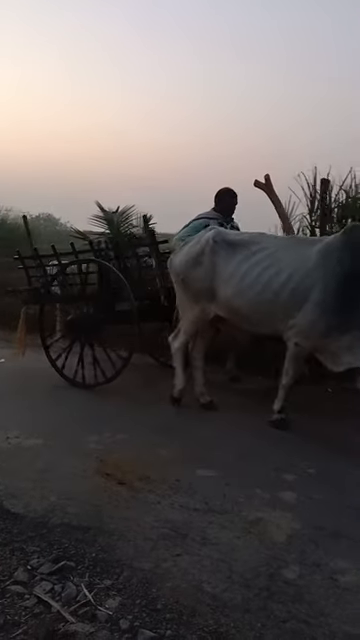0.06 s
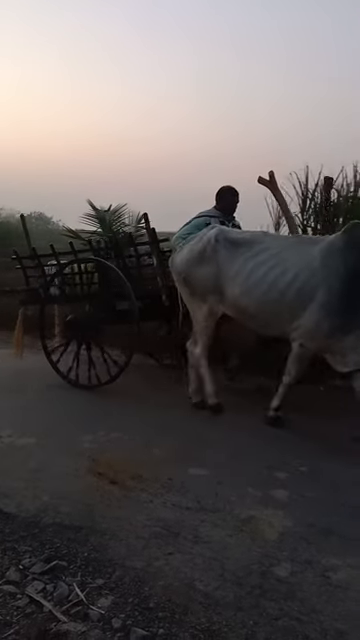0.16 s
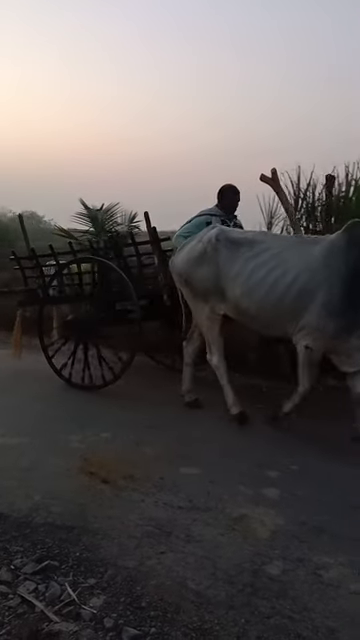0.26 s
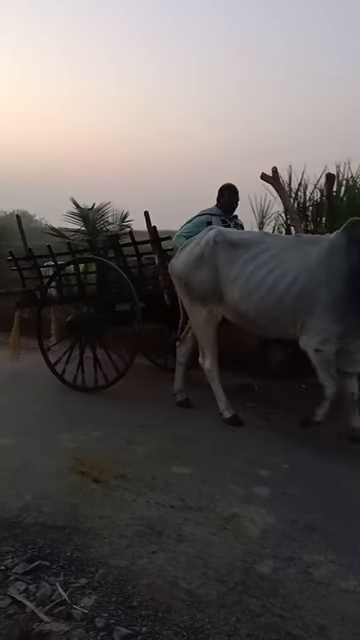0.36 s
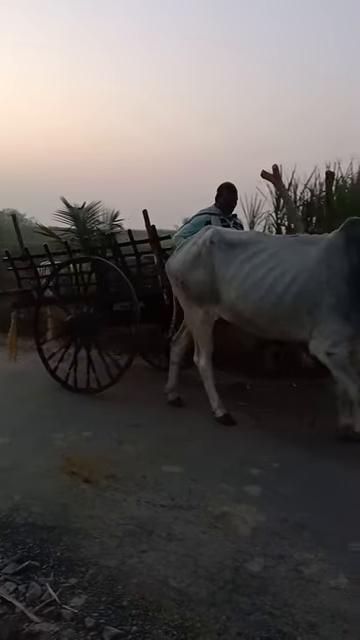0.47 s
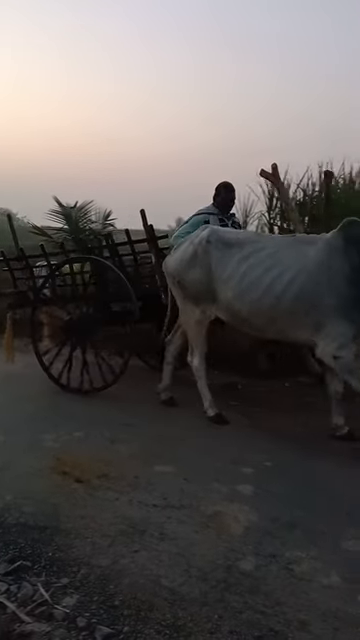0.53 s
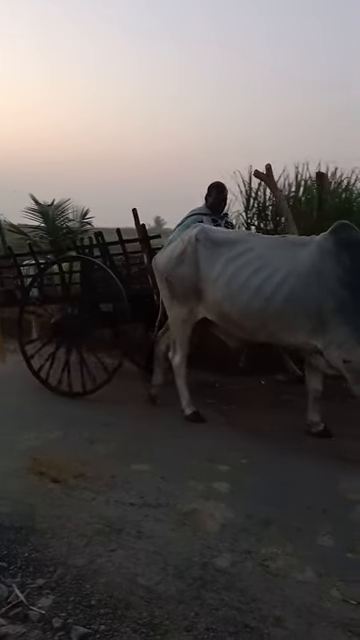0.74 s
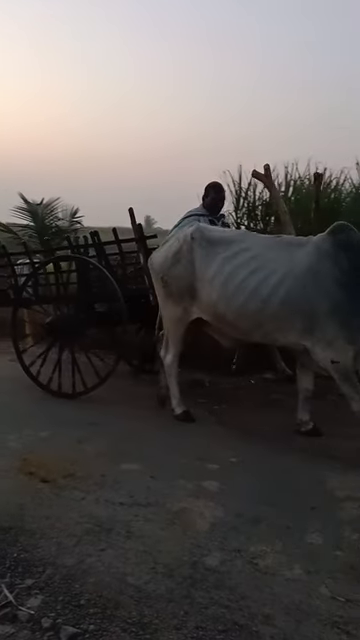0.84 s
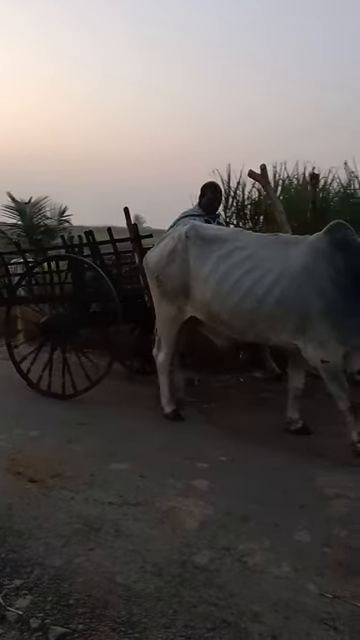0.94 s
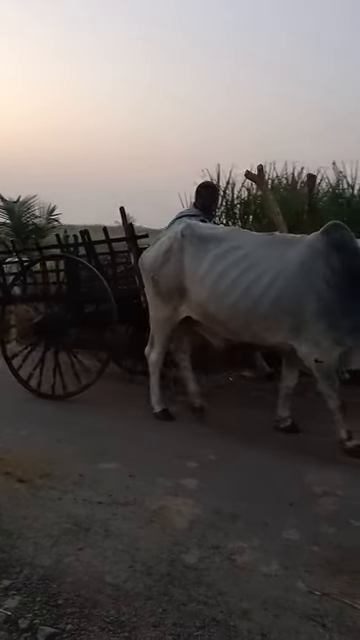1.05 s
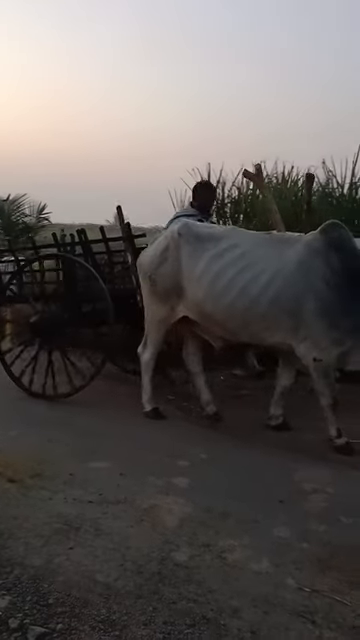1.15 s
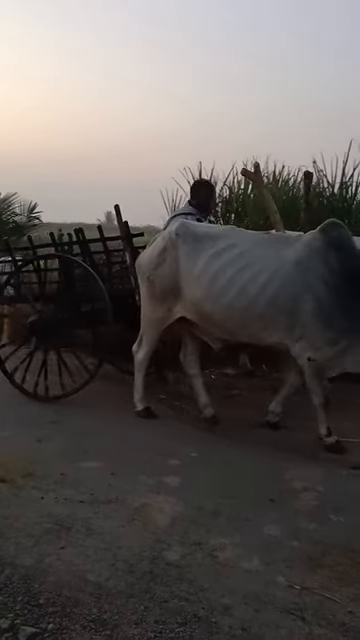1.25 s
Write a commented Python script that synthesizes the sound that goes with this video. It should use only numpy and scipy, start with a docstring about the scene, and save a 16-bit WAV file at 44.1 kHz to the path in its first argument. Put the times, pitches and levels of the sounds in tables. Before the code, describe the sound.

Loose ironwork clatters on a rolling bullock cart, with low thuds, then quietens.

```python
"""Loose iron fittings clatter on a wooden cart that a bullock draws slowly over a rough road.
Each jolt sets off dense tiny impacts, which excite the resonant modes of wheel rim and fittings.
The rim also rings low, a chain clinks brightly, a slat knocks, and hooves and wheels thud,
all as damped free vibrations. Grit cracks under the tyre and the cart bed rumbles;
after the run of jolts the cart quietens."""
import sys
import numpy as np
from scipy import signal
from scipy.fft import rfft, irfft
from scipy.io import wavfile
from scipy.ndimage import uniform_filter1d

SR = 44100
rng = np.random.default_rng(int(sys.argv[2]) if len(sys.argv) > 2 else 0)


def int16_out(signal):
    """Quantize to a 16-bit WAV file."""
    q = np.round(np.clip(np.atleast_2d(signal).T, -1, 1) * 32767)
    wavfile.write(sys.argv[1], SR, q.astype(np.int16))


N = 57330
TIME = np.arange(N) / SR
FOCUS_HZ, SPREAD_DB = 354, 3  # reach of an impact around its brightest mode; scatter of mode levels

# Spectrum of the unpitched clatter. Each row: frequency in Hz, relative spectral level in dB.
CLATTER = [(400, -45), (900, -12.5), (1300, -9.5), (2400, -6.5), (2800, -7.5), (3300, -5.5), (4900, -14),
           (6800, -19), (8000, -25.5), (9300, -33.5), (11000, -30.5), (12500, -31.5), (13500, -20.5),
           (15300, -41.5)]


def clattering_iron():
    """Forced resonance: impacts drive the modes of the ironwork, and each jolt favours other modes."""
    # Jolts of loose iron. Each row: start in seconds, level in dB, low and treble offsets in dB,
    # brightest frequency in Hz, 60 dB decay time in seconds, rise time in seconds.
    jolts = [(0.0024, -34.5, -21, -41, 3660, 0.18, 0.00064), (0.046, -31.5, -25, -30, 5370, 0.051, 0.0023),
             (0.066, -34, -12, -8.5, 3870, 0.072, 0.00083), (0.1404, -36, -17, -1, 6200, 0.25, 0.0089),
             (0.178, -28, -8, -13, 2730, 0.044, 0.0013), (0.2126, -26, -7, -11, 4840, 0.22, 0.0033),
             (0.247, -19.5, -27, -41, 4300, 0.16, 0.0016), (0.2504, -8, -7, -17.5, 1490, 0.047, 0.0044),
             (0.2867, -13.5, -8, -11.5, 2570, 0.085, 0.0033), (0.323, -12, -9, -10.5, 3950, 0.051, 0.0046),
             (0.3467, -16.5, -16, -5, 6200, 0.073, 0.0079), (0.3592, -12.5, -9, -8.5, 6840, 0.16, 0.0036),
             (0.416, -24.5, 1.5, -16, 6260, 0.34, 0.0072), (0.4307, -19, -24.5, -10, 4070, 0.12, 0.00073),
             (0.453, -25.5, -24, -3, 6100, 0.31, 0.0017), (0.4703, -9.5, -7, -10.5, 2400, 0.13, 0.0064),
             (0.49, -23, -0.5, -12, 3740, 0.16, 0.0023), (0.511, -9, -4.5, -10.5, 4970, 0.079, 0.0022),
             (0.5337, -27, 5, -3.5, 3520, 0.25, 0.0021), (0.5555, -41, 19, -13, 2170, 0.16, 0.0038),
             (0.591, -20.5, -5, -7, 3340, 0.038, 0.0013), (0.63, -20.5, -6.5, -17.5, 1370, 0.15, 0.0018),
             (0.661, -23.5, -12, -15, 1410, 0.13, 0.0013), (0.708, -14, -8, -10.5, 4880, 0.088, 0.0027),
             (0.7474, -25, -8.5, -13.5, 1650, 0.093, 0.0013), (0.815, -32, -5, -10, 4160, 0.048, 0.00085),
             (0.942, -53.5, -1.5, -8, 2060, 0.12, 0.003), (1.0025, -55, 1, -12, 3900, 0.16, 0.0024),
             (1.064, -31.5, -6, -8.5, 3200, 0.15, 0.01), (1.087, -38, 2, -15, 3160, 0.13, 0.0018),
             (1.1067, -47.5, 7.5, -13, 1930, 0.09, 0.003), (1.172, -47, 2, -44, 3400, 0.3, 0.0034),
             (1.22, -38, -10.5, -13, 4500, 0.14, 0.0049), (1.286, -44, 1.5, -13, 1450, 0.26, 0.0033)]
    # Chatter between jolts. Each row: time in seconds, level in dB, low and treble offsets in dB.
    chatter = [(0.0, -33.5, 5.5, -27), (0.036, -52.5, 2.5, -7), (0.206, -37, -7.5, -16),
               (0.264, -38.5, 14.5, -40), (0.372, -40.5, 16.5, -1), (0.416, -22, -2, -15),
               (0.476, -29, -2, -12), (0.61, -23.5, -5, -52), (0.671, -34.5, 11.5, -6),
               (0.699, -43, 11.5, -45), (0.714, -45, 26, -11), (0.845, -60.5, 11, -1),
               (0.857, -68, 21.5, -39), (0.992, -78.5, -2.5, -24), (1.092, -69, 18, -18),
               (1.284, -76, 2, -44), (1.3, -69, 10, -43)]
    # Modes of the wheel rim, of the small fittings, and thin ones in the treble.
    # Each row: frequency in Hz, bandwidth in Hz, relative level in dB.
    rim = [(1101, 71, -4.5), (1210, 66, -4), (1273, 28, -3.5), (1356.6, 21, -2.5), (1424, 20, -2.5),
           (1493, 17, -4), (1744, 36, 1.5), (1962.5, 35, -4.5), (2239, 33, -5), (2380, 49, -3),
           (2582, 19, -2), (2552, 33, -3)]
    fittings = [(3330, 26, -3.5), (3235, 11, -4.5), (3744, 88, -2.5), (3590, 31, -7), (3970, 22, -24.5),
                (4435, 50, -7.5), (4744, 140, -1), (4957, 120, -2), (5066, 40, -6.5), (5324, 29, -5.5),
                (5640, 150, -2), (6107, 100, -2.5), (6080, 39, -15), (6637, 29, -8.5), (7580, 51, -17)]
    thin_modes = [(12300, 150, -10), (12800, 150, -10), (13250, 90, -6), (13800, 90, -7), (14600, 80, -8),
                  (15000, 120, -9), (15250, 120, -8)]
    low_hz, treble_hz = 3000, 9500  # borders of the low, middle and treble bands
    hiss_db, ring_db, focus_db = -16, -17, 8
    _, _, jolt_low, jolt_treble, brightest_hz, _, _ = np.transpose(jolts)
    times, chatter_db, chatter_low, chatter_treble = np.transpose(chatter)
    offsets_db = (jolt_low, np.zeros(len(jolts)), jolt_treble)
    # The treble of a jolt dies faster than the two lower bands.
    powers = [np.array([jolt(start, db, rise, t60 / haste) ** 2
                        for start, db, _, _, _, t60, rise in jolts]) for haste in (1, 1, 1.34)]
    chatter_power = [gain_of(np.interp(TIME, times, chatter_db + offset)) ** 2
                     for offset in (chatter_low, 0, chatter_treble)]
    trains = [impacts() for _ in range(4)]
    out = np.zeros(N)
    # Unpitched clatter, band by band.
    for band, edges in enumerate(((0, low_hz), (low_hz, treble_hz), (treble_hz, SR))):
        drive = np.sqrt(gain_of(offsets_db[band]) ** 2 @ powers[band] + chatter_power[band])
        scale = np.std(coloured(trains[0], CLATTER, *edges))
        out += gain_of(hiss_db) * coloured(trains[0] * drive, CLATTER, *edges) / scale
    # Ringing, mode by mode.
    modes = [(hz, width, ring_db + db) for hz, width, db in rim + fittings + thin_modes] + minor_modes()
    scatter_db = SPREAD_DB * np.clip(rng.standard_normal((len(jolts), len(modes))), -3, 1.5)
    for k, (hz, width, db) in enumerate(modes):
        band = int(hz > low_hz) + int(hz > treble_hz)
        favour_db = offsets_db[band] + focus_db * nearness(hz, brightest_hz) + scatter_db[:, k]
        drive = np.sqrt(gain_of(favour_db) ** 2 @ powers[band] + chatter_power[band] * wander())
        force = trains[k % len(trains)] * drive
        out += gain_of(db) * rng.choice([-1, 1]) * resonator(force, hz, width)
    return out


def jolt(start, db, rise, t60):
    """Superposed decays: the envelope of a sharp first contact and the longer rattle after it."""
    contact = gain_of(0.5) * blow(start, rise / 2, t60=0.0091)
    return gain_of(db) * (contact + blow(start, rise, t60))


def impacts(per_second=3000, spread_db=3, flicker_db=1.8):
    """Shot noise: tiny impulses of uneven size, whose strength swells in clumps."""
    size = gain_of(spread_db * np.minimum(rng.exponential(1, N), 4)) * rng.choice([-1, 1], N)
    clumps = gain_of(flicker_db * smooth_noise(90))
    return unit_rms(size * (rng.random(N) < per_second / SR) * clumps)


def minor_modes(count=70, lo_hz=1050, hi_hz=8800, width_hz=60, offset_db=-19):
    """Even modal density: weak resonances, one to a frequency slot, follow the clatter spectrum."""
    pitches = lo_hz + (hi_hz - lo_hz) * (np.arange(count) + rng.random(count)) / count
    clatter_hz, clatter_db = np.transpose(CLATTER)
    levels = offset_db + np.interp(np.log(pitches), np.log(clatter_hz), clatter_db)
    return [(hz, width_hz, db) for hz, db in zip(pitches, levels)]


def wander(depth_db=4, step_s=0.03):
    """Random modulation of power: the chatter feeds a mode by fits and starts."""
    knots = np.arange(0, N / SR + step_s, step_s)
    return gain_of(np.interp(TIME, knots, depth_db * (rng.standard_normal(len(knots)) - 1))) ** 2


def resonator(force, hz, width_hz):
    """Resonance of one damped mode; a second, wider pole steepens its skirts."""
    radius = np.exp(-np.pi * width_hz / SR)
    turn, wide = np.exp(2j * np.pi * hz / SR), radius ** 8
    narrowed = signal.lfilter([1 - wide], [1, -wide * turn], force)
    return np.sqrt(2 * (1 - radius ** 2)) * signal.lfilter([1], [1, -radius * turn], narrowed).real


def ringing_iron(rise_s=0.004, focus_db=16):
    """Modal superposition: low rings of the wheel rim and bright clinks of a chain."""
    # Strikes on rim or chain. Each row: start in seconds, level in dB, brightest frequency in Hz.
    strikes = [(0.045, -43.5, 5500), (0.044, -39, 3560), (.141, -36, 6200), (.143, -52, 4430),
               (.362, -30, 6700), (1.084, -42, 1980), (1.098, -42, 1900), (1.108, -47.5, 1340),
               (1.128, -49, 2520), (1.172, -52, 4380), (1.176, -47, 3560), (1.183, -45, 5870),
               (1.186, -56, 3000), (1.194, -44, 3830), (1.214, -47, 4310), (1.218, -48.5, 5230),
               (1.228, -49, 6100), (1.228, -56, 3060), (1.24, -50, 3390), (1.284, -50, 1450)]
    # Low modes of the wheel rim and bright ones of the chain.
    # Each row: frequency in Hz, relative level in dB, 60 dB decay time in seconds.
    iron_modes = [(1320, -2.5, 0.24), (1418, -2, 0.23), (1810, 3.5, 0.16), (1997, -4.5, .3),
                  (2597, 0.5, 0.32), (3032, 1, 0.2), (3608, 0.5, 0.15), (3610, 0, 0.18), (4366, 3, 0.14),
                  (5340, -4, 0.22), (5308, 5, 0.12), (5800, -1, 0.076), (6180, 0, 0.097), (6900, -2, 0.077)]
    hz, mode_db, t60 = np.transpose(iron_modes)[:, :, None]
    draws = rng.random((len(strikes), 2, len(iron_modes), 1))
    wavers = np.array([waver() for _ in iron_modes])
    out = np.zeros(N)
    for (start, db, brightest_hz), (weakening, phase) in zip(strikes, draws):
        at = round(start * SR)
        t = TIME[:min(N - at, SR // 2)]
        span = slice(at, at + len(t))
        favour_db = focus_db * (nearness(hz, brightest_hz) - 1) - SPREAD_DB * weakening
        tones = gain_of(db + mode_db + favour_db - 60 * t / t60) * np.sin(2 * np.pi * (hz * t + phase))
        out[span] += (1 - np.exp(-t / rise_s)) * (tones * wavers[:, span]).sum(0)
    return out


def slat():
    """Free vibration of a wooden slat: each knock leaves one damped tone."""
    # Knocks. Each row: start in seconds, level in dB, pitch in Hz, 60 dB decay time in seconds.
    knocks = [(0.051, -48, 647, 0.052), (0.138, -35, 758, 0.063), (0.149, -37, 953, 0.087),
              (0.178, -46, 671, 0.21), (0.217, -38.5, 723, 0.29), (0.303, -42, 714.6, 0.67),
              (0.37, -22.5, 720.8, 0.1), (0.416, -27.5, 745, 0.12), (0.453, -26, 729.5, 0.19),
              (0.489, -37, 558, 0.063), (0.501, -29, 701, 0.064), (0.533, -41, 723, 0.15),
              (0.88, -37.5, 593.7, 0.051), (0.905, -48, 620.4, 0.074), (0.918, -46.5, 698, 0.059),
              (1.1, -53, 600, 0.1), (1.226, -45.5, 726, 0.045)]
    return damped_tones(knocks, rise_s=0.0022)


def hooves_and_bumps():
    """Soft impact: hoof falls and wheel bumps give low damped tones with a blunt onset."""
    # Thuds. Each row: start in seconds, level in dB, pitch in Hz, 60 dB decay time in seconds.
    thuds = [(.045, -44, 230, 0.16), (.1, -43.5, 234, 0.33), (.13, -49.5, 74.4, 0.34),
             (.27, -38.5, 200, 0.23), (.325, -29.5, 233, 0.097), (.36, -35, 235.4, 0.1),
             (.477, -24, 105, 0.055), (.5, -24.5, 169.8, 0.088), (.523, -30, 120, 0.025),
             (.545, -35.5, 155.3, 0.081), (.65, -47, 70.5, 0.23), (.7, -23, 195, 0.092),
             (.73, -22, 235, 0.08), (.76, -18.5, 230, 0.024), (1.08, -54.5, 131.7, 0.18)]
    return damped_tones(thuds, rise_s=0.0069)


def grit():
    """Brittle fracture: grains crack under the tyre in short, bright bursts without pitch."""
    # Cracks. Each row: start in seconds, level in dB.
    cracks = [(0.687, -42), (0.769, -48), (0.787, -37), (0.842, -48.5)]
    envelope = sum(gain_of(db) * blow(start, rise=0.0011, t60=0.02) for start, db in cracks)
    return envelope * unit_rms(coloured(impacts(), CLATTER, lo_hz=3750))


def rumble(deep_hz=150, hollow_hz=330, top_hz=950):
    """Structure-borne noise: wheels on grit sound through the cart bed in three low bands."""
    # Course of the rumble. Each row: time in seconds, levels of the board, deep and hollow bands in dB.
    levels = [(0.0, -65, -67.5, -60.5), (0.078, -68, -75, -53.5), (0.13, -61, -61, -59.5),
              (0.18, -54.5, -53, -71), (0.238, -74, -78, -76), (0.278, -45, -73, -54.5),
              (0.306, -48, -54.5, -53.5), (0.382, -63, -73, -78), (0.434, -68, -89, -76),
              (0.468, -58, -49, -72), (0.485, -39, -43.5, -41.5), (0.5, -46.5, -43, -37.5),
              (0.596, -50, -59, -44), (0.666, -37, -41, -48.5), (0.72, -58, -43, -46.5),
              (0.744, -52, -57, -48.5), (0.811, -48.5, -56, -54.5), (0.898, -63, -78, -69),
              (0.974, -68, -90, -85), (1.11, -73, -58, -60.5), (1.14, -63, -85, -60.5),
              (1.183, -64.5, -57.5, -68), (1.276, -77, -84, -77.5), (1.3, -55, -86, -59)]
    # Response of the cart bed. Each row: frequency in Hz, relative spectral level in dB.
    bed = [(25, -33.5), (45, -29), (70, -1), (140, 1), (200, 17.5), (235, 12), (320, 6), (400, 4),
           (600, 10.5), (900, -0.5)]
    times, boards, deep, hollow = np.transpose(levels)
    bands = ((deep, 0, deep_hz), (boards, deep_hz, hollow_hz), (hollow, hollow_hz, top_hz))
    return sum(gain_of(np.interp(TIME, times, db))
               * unit_rms(coloured(rng.standard_normal(N), bed, lo, hi)) for db, lo, hi in bands)


def reflections(direct, level_db=-14.5, cutoff_hz=4630):
    """Diffuse scattering from road and cart adds a faint, short, dull tail."""
    tail = rng.standard_normal(N) * blow(0.0071, rise=0.0086, t60=0.15)
    tail = signal.lfilter(*signal.butter(2, cutoff_hz, fs=SR), tail)
    return gain_of(level_db) * signal.fftconvolve(direct, tail / np.linalg.norm(tail))[:N]


def damped_tones(rows, rise_s):
    """Damped oscillation: one decaying sinusoid of random phase for each impact."""
    return waver() * sum(gain_of(db) * blow(start, rise_s, t60)
                         * np.sin(2 * np.pi * (hz * TIME + rng.random())) for start, db, hz, t60 in rows)


def blow(start, rise, t60):
    """Exponential decay after a quick rise: 60 dB in t60 seconds, or in 10 ms if that is longer."""
    t = np.maximum(TIME - start, 0)
    return (1 - np.exp(-t / rise)) * gain_of(-60 * t / max(t60, 0.01))


def nearness(hz, brightest_hz):
    """Selective excitation: a Gaussian weight, 1 at the brightest frequency of an impact."""
    return np.exp(-((hz - brightest_hz) / FOCUS_HZ) ** 2)


def waver(depth=0.3, rate_hz=90):
    """Amplitude modulation about 1: loose parts damp a tone unevenly."""
    return 1 + depth * smooth_noise(int(SR / rate_hz / 2))


def smooth_noise(samples):
    """Low-pass noise of unit RMS, from two moving averages."""
    return unit_rms(uniform_filter1d(uniform_filter1d(rng.standard_normal(N), samples), samples))


def coloured(x, spectrum, lo_hz=0, hi_hz=SR):
    """Spectral shaping of a signal between two band edges."""
    knots_hz, db = np.transpose(spectrum)
    hz = np.fft.rfftfreq(N, 1 / SR)
    response = gain_of(np.interp(np.log(hz + 1), np.log(knots_hz), db))
    return irfft(rfft(x) * response * (hz >= lo_hz) * (hz < hi_hz), N)


def unit_rms(x):
    """Normalisation to unit mean power."""
    return x / np.sqrt(np.mean(x ** 2) + 1e-20)


def gain_of(db):
    """Amplitude ratio of a level in decibels."""
    return 10 ** (np.asarray(db) / 20)


def scene():
    """Superposition of direct sound, reflections and rumble in one channel."""
    direct = clattering_iron() + ringing_iron() + grit() + slat() + hooves_and_bumps()
    return (direct + reflections(direct) + rumble())[None]


def record(dry):
    """Band limiting: a steep low-pass removes the highest treble."""
    low_pass = signal.firwin(511, cutoff=15550, window=("kaiser", 9), fs=SR)
    return signal.oaconvolve(dry, low_pass[None], "same")


dry = scene()
out = record(dry)
int16_out(out)
```